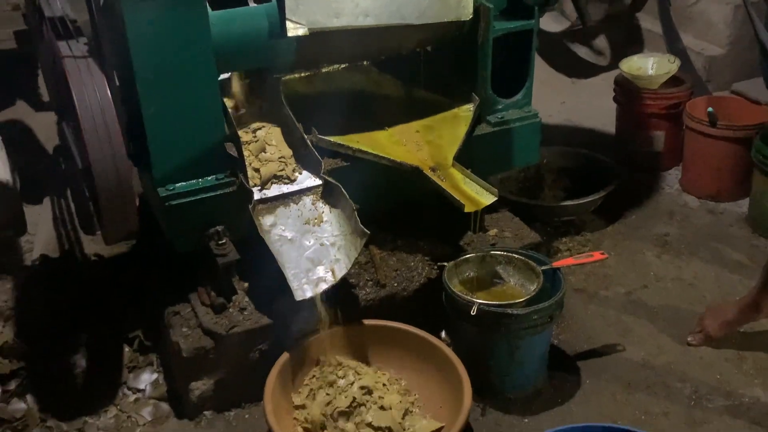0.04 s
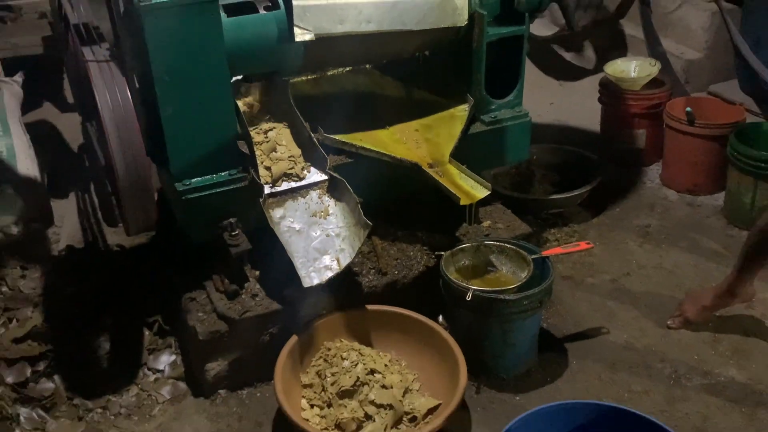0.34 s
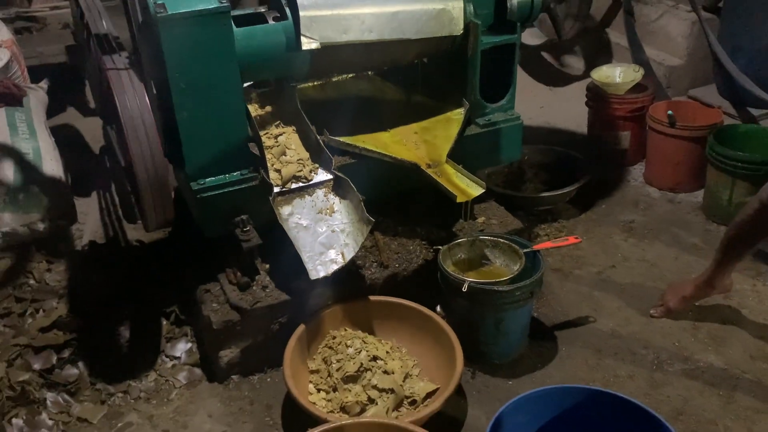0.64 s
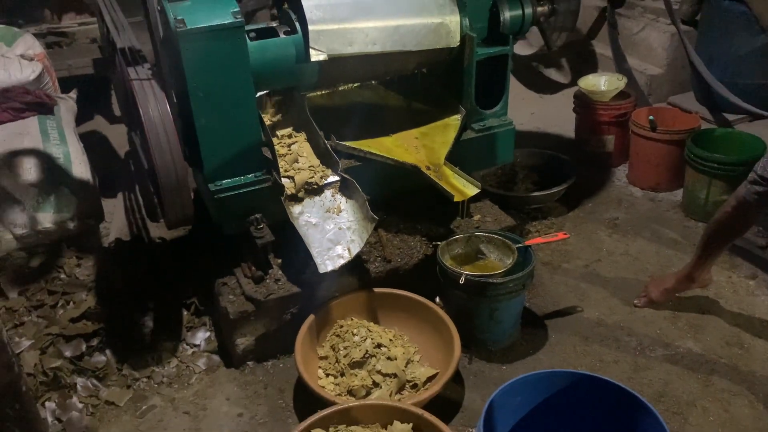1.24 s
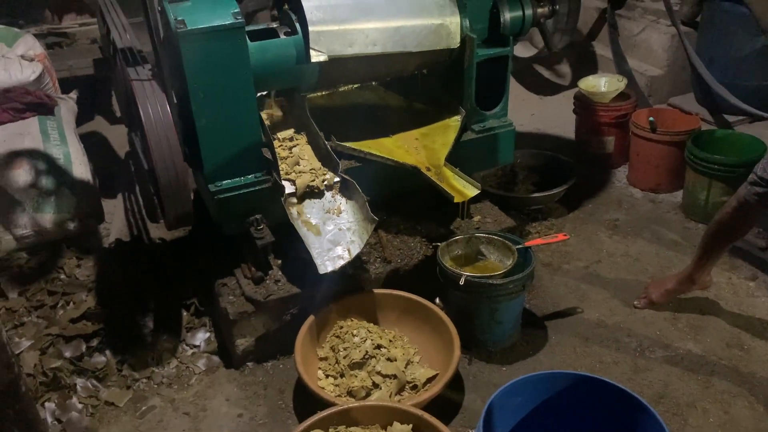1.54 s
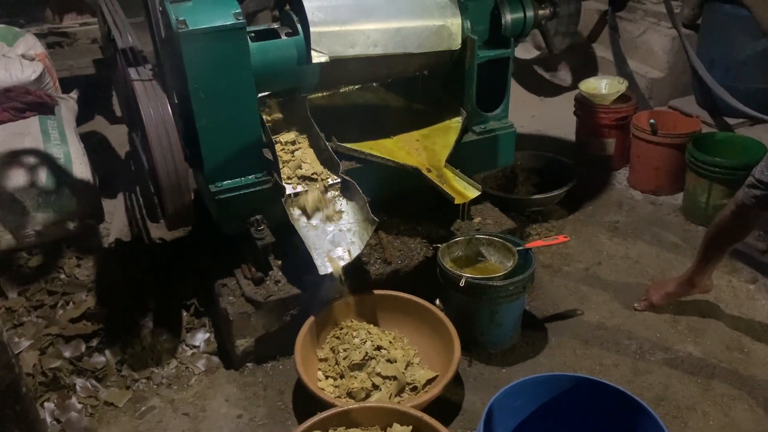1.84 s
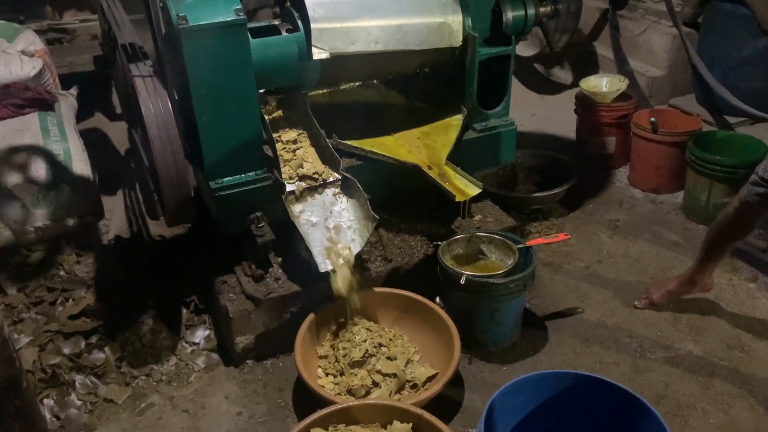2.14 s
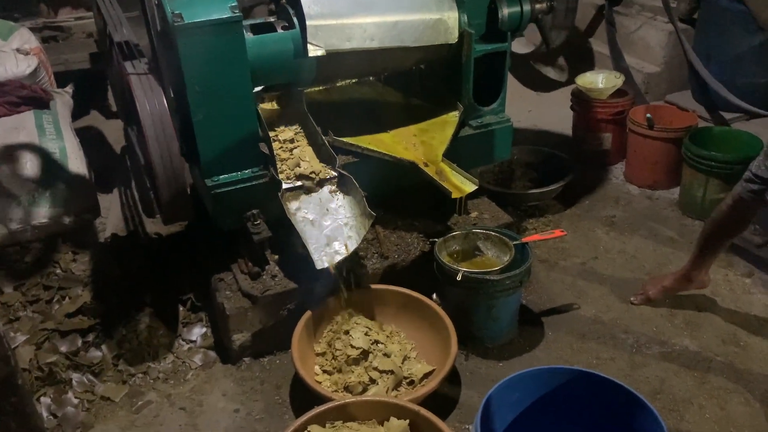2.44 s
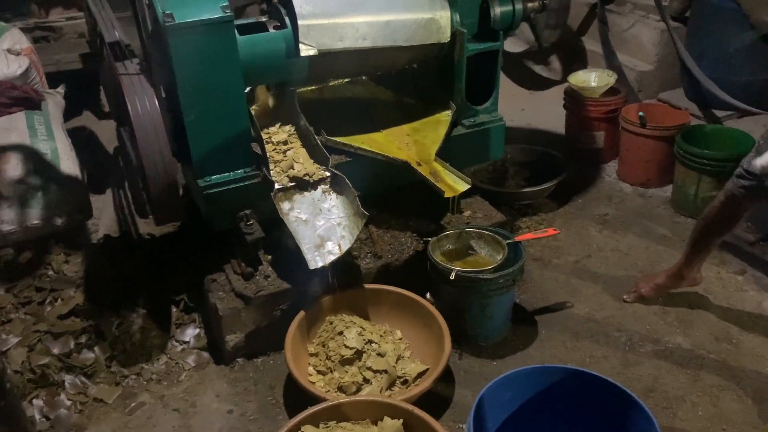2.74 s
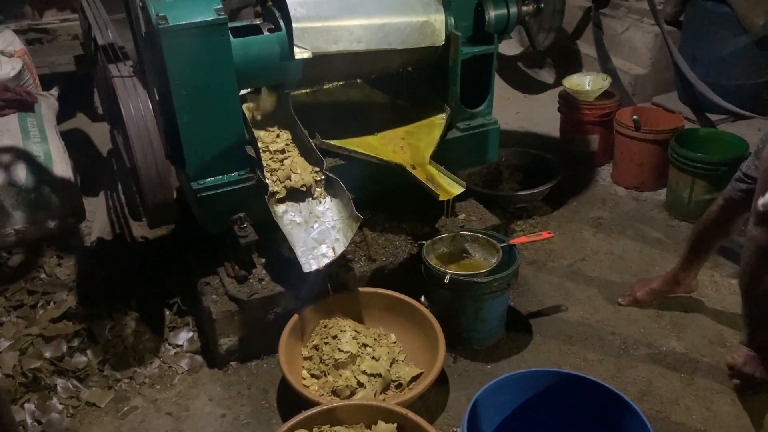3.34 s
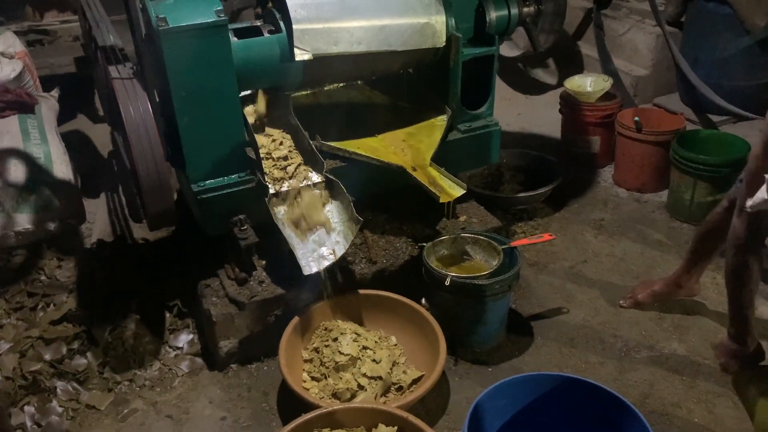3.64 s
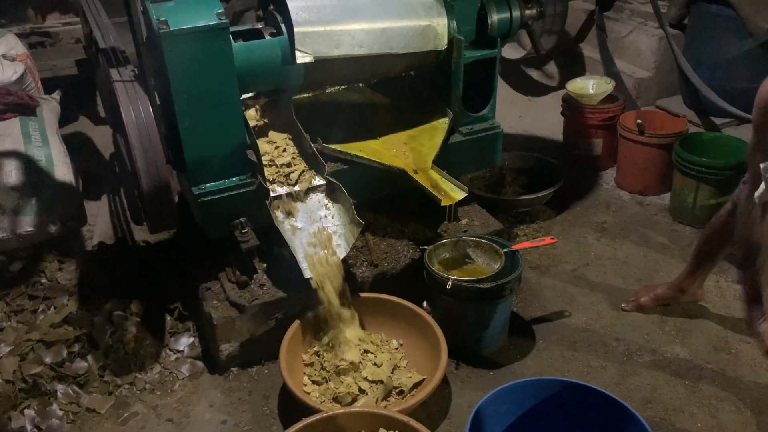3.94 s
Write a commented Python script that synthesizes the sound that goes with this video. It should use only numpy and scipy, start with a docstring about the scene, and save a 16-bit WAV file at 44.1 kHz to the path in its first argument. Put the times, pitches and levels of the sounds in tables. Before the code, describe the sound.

An engine-driven oil press runs with fast, regular thumping, metallic clatter and a low rumble.

```python
"""An oil press grinds steadily in a workshop, belt-driven by what sounds like a slow one-cylinder diesel,
while frame and room drone along. Nine times a second a run of knocks rings the block, rattles loose
parts and makes the frame boom; then a puff of gas hisses out and the exhaust thumps. Once a lap the
belt joint rasps over a pulley, and between its passes the rumble swells.
Two closely spaced microphones pick it up."""
import sys
import numpy as np
from scipy import signal
from scipy.fft import rfft, irfft
from scipy.io import wavfile
from scipy.ndimage import uniform_filter1d, map_coordinates

SR = 44100
rng = np.random.default_rng(int(sys.argv[2]) if len(sys.argv) > 2 else 0)


def wrap_up_sound(samples):
    """Save the sound to the file named by the first command line argument, as 16-bit audio."""
    columns = np.atleast_2d(samples).T
    # keep every value between -1 and 1, then stretch to whole-number steps
    tamed = np.clip(columns, -1, 1)
    steps = np.round(tamed * 32767).astype(np.int16)
    wavfile.write(sys.argv[1], SR, steps)


N = 176400
CYCLE_S, CYCLE_SAMPLES = .110087, 4836  # firing period; points in one stored cycle


def amp(db):
    """Amplitude ratio of a level in decibels."""
    return 10 ** (np.asarray(db) / 20)


def unit_rms(x):
    """Normalisation to unit mean power."""
    return x / np.sqrt(np.mean(abs(x) ** 2) + 1e-20)


def curve(points, hz):
    """Interpolation on a logarithmic frequency axis."""
    f, value = np.transpose(points)
    return np.interp(np.log(hz + 1), np.log(f + 1), value)


def flutter(depth_db, size):
    """Random amplitude modulation of rms 1, correlated over size samples."""
    drift = unit_rms(uniform_filter1d(rng.standard_normal(N), size))
    return unit_rms(amp(depth_db * drift))


def microphones(shared, unrelated, hz):
    """Partial coherence: spaced microphones receive spectra that agree only in part."""
    # Each row: frequency in Hz, coherence from 0 to 1.
    coherence = [(120, 1), (170, .97), (280, .77), (430, .95), (700, .6), (1000, .42), (1600, .44),
                 (2600, .28), (5800, 0), (7200, .8), (8000, 1), (11000, 1), (12200, .5), (13000, 1),
                 (14500, 1), (16000, .3)]
    # Each row: frequency in Hz, phase lead of the left side in radians.
    lead = [(30, 0), (90, -.2), (170, -.4), (300, -.35), (450, -1.3), (700, -2.3), (900, -2.7),
            (1300, -1.6), (1900, -2.9), (2500, -4.5), (6200, -6.5), (7300, -7.5), (8500, -9.42),
            (11000, -12.57), (13500, -15.7), (15800, -18.85)]
    # Each row: frequency in Hz, left minus right level in dB.
    balance = [(70, 1.9), (140, 0), (280, 1), (620, .6), (1100, -1), (2000, .5), (3500, -.5), (5400, -2.2),
               (7500, -0.4), (16000, 0)]
    same = np.clip(curve(coherence, hz), 0, 1)
    tilt_db = curve(balance, hz) / 2
    right = (same * shared + np.sqrt(1 - same ** 2) * unrelated) * np.exp(-1j * curve(lead, hz))
    return np.array([shared * amp(tilt_db), right * amp(-tilt_db)])


def casing(hz):
    """Resonance: each mode of the iron casing lifts a narrow band."""
    # Each row: centre in Hz, width in Hz, lift in dB.
    modes = [(513, 26, 5.5), (739, 17, 2), (775, 28, 6), (921, 24, 7), (1049, 30, 6), (1215, 45, 2),
             (1278, 28, 6), (1484, 44, 3), (1661, 21, 6), (1920, 35, 7), (2003, 16, 5), (7530, 44, 4)]
    return amp(sum(db / (1 + (2 * (hz - centre) / width) ** 2) for centre, width, db in modes))


def noise(colour, ring_share=1):
    """Source and filter: stereo noise of a given spectrum, radiated through the casing."""
    hz = np.fft.rfftfreq(N, 1 / SR)
    white = microphones(*rfft(rng.standard_normal((2, N))), hz)
    return irfft(white * amp(curve(colour, hz)) * casing(hz) ** ring_share, N) * np.sqrt(SR / 2)


def crank():
    """Phase in engine cycles from the first puff; the period shortens very slightly."""
    first_s, speedup_s = .0646, 9.7e-6
    n = np.arange(-2, 40)
    return np.interp(np.arange(N) / SR, first_s + CYCLE_S * n - speedup_s * n ** 2, n)


def bursts(turns, rows, rise_s):
    """Incoherent blows add in power. Each row: start in seconds from the puff, strength, decay in seconds."""
    power = 0
    for at, strength, decay_s in rows:
        age = (turns * CYCLE_S - at) % CYCLE_S
        power = power + (strength * (1 - np.exp(-age / rise_s)) * np.exp(-age / decay_s)) ** 2
    return np.sqrt(power)


def periodic(harmonics, turns):
    """Fourier synthesis: harmonics of the firing rate form a wave locked to the crank."""
    cycle = irfft(harmonics, CYCLE_SAMPLES) * CYCLE_SAMPLES / np.sqrt(2)
    position = turns % 1 * CYCLE_SAMPLES
    return np.array([map_coordinates(side, [position], order=3, mode="grid-wrap") for side in cycle])


def grinding():
    """Friction noise: gears and screw churn steadily, coupled only in part to the casing."""
    # Each row: frequency in Hz, relative spectral level in dB.
    colour = [(15, -88), (27, -78), (38, -71), (55, -50), (80, -54.5), (120, -60), (160, -54), (185, -56.5),
              (210, -54.5), (290, -52.5), (340, -61.5), (430, -59), (510, -57), (640, -61), (770, -55.5),
              (840, -64), (1000, -61), (1400, -62), (2000, -63), (3000, -68.5), (4500, -74.5),
              (6000, -76.5), (7300, -73.5), (9700, -75), (12500, -77.5), (16000, -79)]
    return noise(colour, ring_share=.6) * flutter(depth_db=1.17, size=900)


def block(turns):
    """Forced vibration: periodic blows ring block, frame and room; the low tones never die away."""
    # Each row: frequency in Hz, relative spectral level in dB.
    ring = [(140, -56), (220, -58), (300, -56), (420, -60), (520, -59), (650, -61.5), (920, -64.5),
            (1100, -65), (1290, -62), (1550, -68), (1930, -70), (2400, -73.5), (3500, -77)]
    # Each row: harmonic number of a strong tone of frame and room, level in dB.
    drone = [(21, -39.0), (22, -39.4), (26, -43.4), (27, -43.3), (28, -36.1), (29, -43.1), (31, -43.0),
             (32, -41.9), (34, -42.1), (38, -44.4), (39, -44.5), (43, -44.4), (49, -41.6), (52, -44.1),
             (56, -39.3), (57, -40.9), (59, -45.5), (60, -44.5), (61, -42.8), (62, -45.7), (67, -46.3),
             (80, -44.4)]
    boom_from_hz, knock_from_hz, drone_struck_hz, drone_peak_s = 380, 720, 480, -.008
    hz = np.fft.rfftfreq(CYCLE_SAMPLES, 1 / SR)
    phase = np.arange(CYCLE_SAMPLES) / CYCLE_SAMPLES
    struck, booming, steady = (unit_rms(rfft(envelope * rng.standard_normal((2, CYCLE_SAMPLES))))
                               for envelope in (knocks(phase), boom(phase), 1))
    bands = np.select([hz > knock_from_hz, hz > boom_from_hz], [struck, booming], steady)
    drive = microphones(*bands, hz)
    out_of_band = (hz < 120) | (hz > 5000)
    level = amp(curve(ring, hz) - 60 * out_of_band) / np.sqrt(CYCLE_S)
    flattened = unit_rms(drive / abs(drive) ** .7)
    harmonics = flattened * level * casing(hz)
    # The upper drone tones come roughly into phase at the knock.
    knocked = microphones(np.exp(-2j * np.pi * hz * drone_peak_s), 0, hz) + .5 * drive
    for k, db in drone:
        tone = knocked[:, k] if hz[k] > drone_struck_hz else drive[:, k]
        harmonics[:, k] = amp(db) * tone / abs(tone)
    return periodic(harmonics, turns)


def knocks(turns):
    """Impact and reverberation: the envelope of a quick run of blows and their tail in the room."""
    # Each row: start in seconds from the puff, strength, decay in seconds.
    blows = [(-.0295, 1., .005), (-.022, 1.4, .003), (-.0185, 1.2, .0025), (-.0148, 1.4, .003),
             (-.009, 1.2, .004), (-.001, .6, .004)]
    direct = bursts(turns, blows, rise_s=.0005)
    room = bursts(turns, [(-.028, .38, .065)], rise_s=.006)
    return np.hypot(direct, room)


def clatter(turns):
    """Impact noise: loose parts rattle a little differently under every blow."""
    # Each row: frequency in Hz, relative spectral level in dB.
    colour = [(400, -70), (700, -57), (900, -58), (1100, -57), (1290, -52), (1520, -58), (2000, -59.5),
              (3000, -71), (5500, -72), (10000, -74), (16000, -77)]
    # Each row: time in seconds, relative level of the rattle in dB.
    vigour = [(0, -5.5), (.3, -4), (.6, -2.5), (1.2, -4.5), (1.6, -10), (2.1, -1), (2.9, -2.3), (3.45, -1),
              (3.9, 0)]
    level_db = np.interp(np.arange(N) / SR, *np.transpose(vigour))
    force = amp(level_db) * flutter(depth_db=.7, size=3000)
    return noise(colour) * knocks(turns) * force


def boom(turns):
    """Damped vibration: the frame's envelope after the blows, with a fast and a slow decay."""
    return bursts(turns, [(-.018, 1.4, .014), (-.012, .36, .07)], rise_s=.006)


def frame(turns):
    """Broad resonance: the struck frame booms in a band of noise."""
    # Each row: frequency in Hz, relative spectral level in dB.
    colour = [(200, -62), (420, -54.5), (530, -45.5), (700, -62), (900, -51), (1300, -97)]
    return noise(colour) * boom(turns)


def hiss(turns):
    """Turbulence: a gritty puff of gas escapes each cycle, varying in moment, strength and length."""
    # Each row: frequency in Hz, relative spectral level in dB.
    colour = [(1000, -90), (3000, -65.5), (4500, -70.5), (6000, -66), (7300, -66), (9000, -63.5),
              (12000, -63.5), (14000, -64.5), (16000, -61.5)]
    # Each row: start in seconds within the cycle, strength, nominal decay in seconds.
    puff_parts = [(-.0015, .75, .012), (-.0015, 1.02, .037), (.031, .36, .018)]
    jitter_s, spread_db, length_spread = .0007, 1.08, .08
    cycle = np.floor(turns + .05).astype(int) + 1  # new draws take over just before each puff
    strong, late, long = rng.standard_normal((64, 3))[cycle].T
    stretch = np.exp(length_spread * long)
    puffs = [(at + jitter_s * late, strength, decay_s * stretch) for at, strength, decay_s in puff_parts]
    envelope = bursts(turns, puffs, rise_s=.0049 * stretch) * amp(spread_db * strong)
    return noise(colour) * envelope * flutter(depth_db=1.1, size=160)


def exhaust(turns):
    """Group delay: the room holds back each thump's lowest and highest tones, so that it rolls on."""
    # Each row: harmonic number, relative level in dB.
    partials = [(3, -55), (4, -40.5), (5, -39), (6, -38), (7, -35.2), (8, -30.6), (9, -40), (10, -35.2),
                (11, -36), (12, -52)]
    delay_s, linger_s, centre_hz, width_hz = .009, .021, 80, 20
    k = np.arange(CYCLE_SAMPLES // 2 + 1)
    hz = k / CYCLE_S
    level = amp(np.interp(k, *np.transpose(partials), left=-120, right=-120))
    group_delay_s = delay_s + linger_s * ((hz - centre_hz) / width_hz) ** 2
    thump = level * np.exp(-2j * np.pi * np.cumsum(group_delay_s) / CYCLE_S)
    return amp(-1) * periodic(microphones(thump, 0, hz), turns)


def belt():
    """Friction excites resonance: the joint scrapes the pulley, metal rings, and the room adds a tail."""
    # Each row: frequency in Hz, relative spectral level in dB.
    colour = [(250, -61), (500, -56), (850, -69), (1300, -61), (2000, -58), (2800, -57.5), (4000, -63),
              (6000, -66), (8000, -72.5), (11000, -72), (16000, -81)]
    # Each row: peak time in seconds, scrape gain in dB, ring pitch in Hz,
    # half-width as a share of that pitch, ring level in dB.
    passes = [(.112, -5, 2750, .15, -44), (.803, -5, 2370, 0.17, -32), (1.501, -3, 2880, 0.16, -32),
              (2.188, -3, 2330, .2, -29), (2.887, -0.5, 1190, 0.054, -30), (3.57, 0, 1420, .2, -47)]
    rise_s, decay_s = .027, .057
    t, hz = np.arange(N) / SR, np.fft.rfftfreq(N, 1 / SR)
    scrape = noise(colour)
    rub = microphones(*rfft(rng.standard_normal((2, N))), hz)
    rasps = 0
    for at, scrape_db, ring_hz, width, ring_db in passes:
        ring = unit_rms(irfft(rub / (1 + ((hz / ring_hz - 1) / width) ** 2), N))
        envelope = np.exp(-(np.minimum(t - at, 0) / rise_s) ** 2 - np.maximum(t - at, 0) / decay_s)
        rasps = rasps + envelope * (amp(scrape_db) * scrape + amp(ring_db) * ring)
    return rasps * flutter(depth_db=2.2, size=90)


def swell():
    """Slow amplitude modulation: the rumble swells between passes of the belt joint."""
    # Each row: frequency in Hz, relative spectral level in dB.
    colour = [(70, -70), (150, -59), (210, -55), (295, -53.5), (370, -60), (500, -62), (1500, -70),
              (3000, -73), (8000, -84)]
    # Each row: peak time in seconds, gain in dB.
    peaks = [(.54, 1.5), (1.22, 4), (1.98, -3.5), (2.63, 1.3), (3.35, -6)]
    t, width_s = np.arange(N) / SR, .079
    return noise(colour) * sum(amp(db) * np.exp(-((t - at) / width_s) ** 2) for at, db in peaks)


def scene():
    """Superposition: the pressures from engine, press and belt add."""
    turns = crank()
    engine = exhaust(turns) + block(turns) + clatter(turns) + frame(turns) + hiss(turns)
    return engine + grinding() + belt() + swell()


def record(dry):
    """Band limiting: a steep low-pass filter removes the highest treble."""
    edge_hz = 15900
    lowpass = signal.firwin(511, edge_hz, window=("kaiser", 9), fs=SR)
    return signal.oaconvolve(dry, lowpass[None], "same")


dry = scene()
out = record(dry)
wrap_up_sound(out)
```